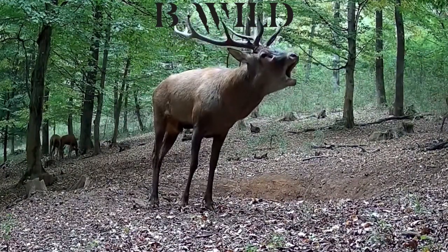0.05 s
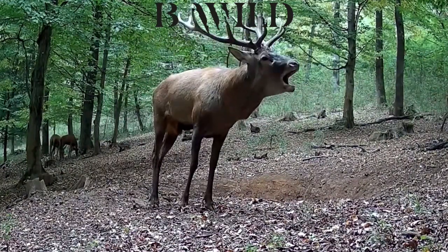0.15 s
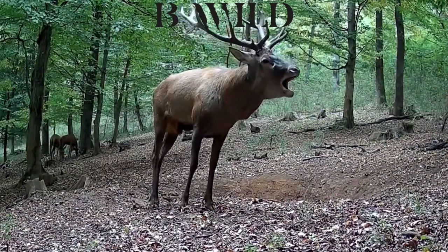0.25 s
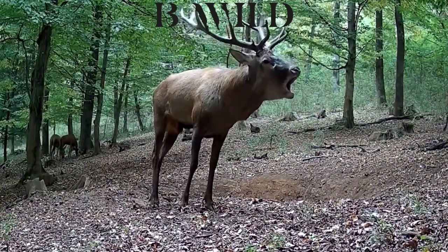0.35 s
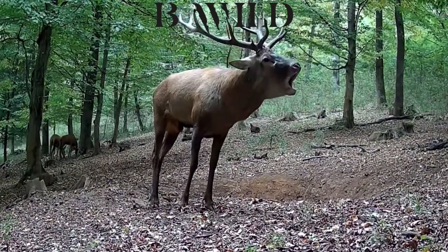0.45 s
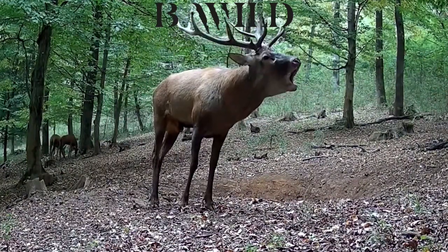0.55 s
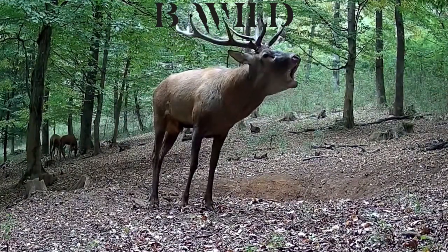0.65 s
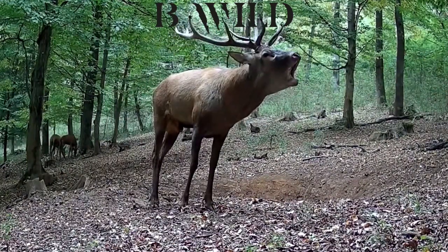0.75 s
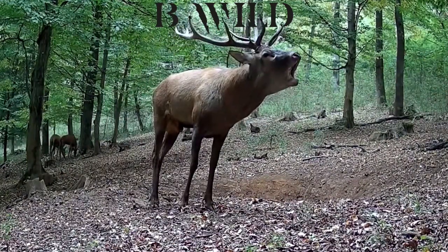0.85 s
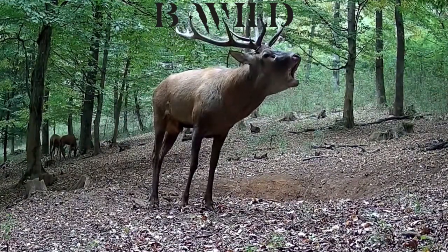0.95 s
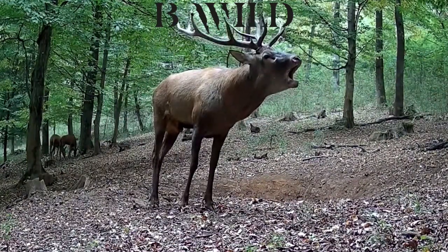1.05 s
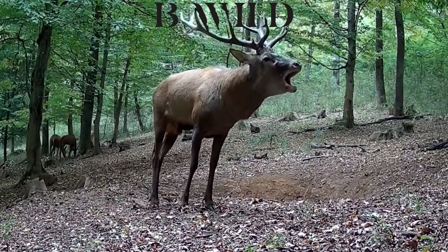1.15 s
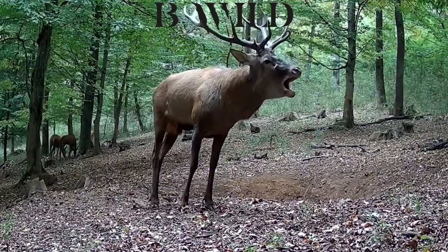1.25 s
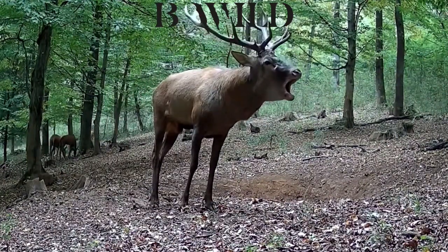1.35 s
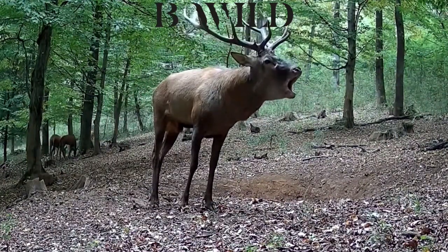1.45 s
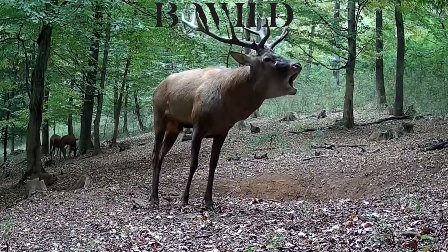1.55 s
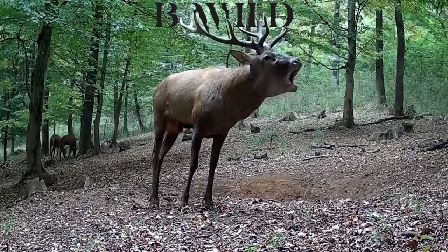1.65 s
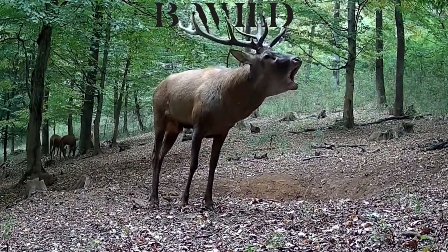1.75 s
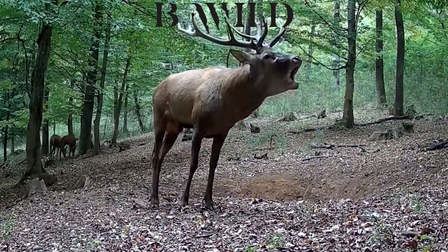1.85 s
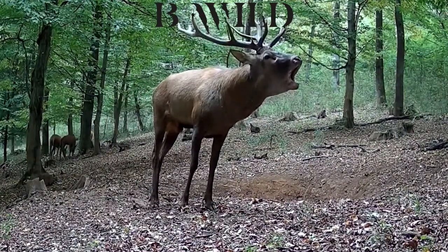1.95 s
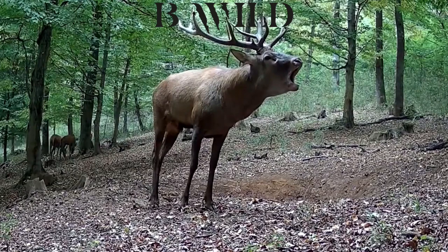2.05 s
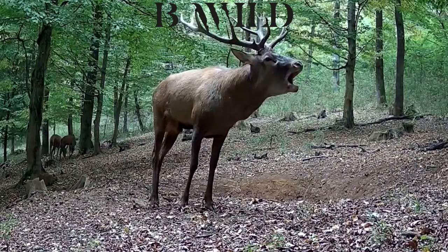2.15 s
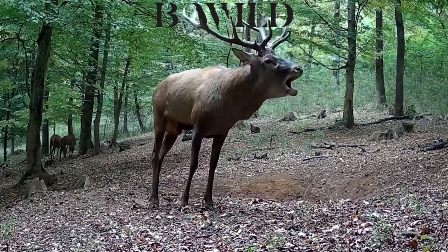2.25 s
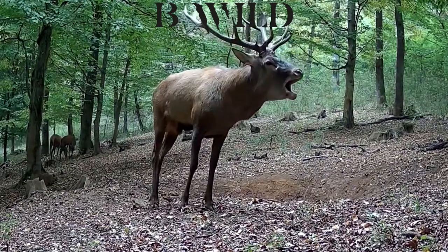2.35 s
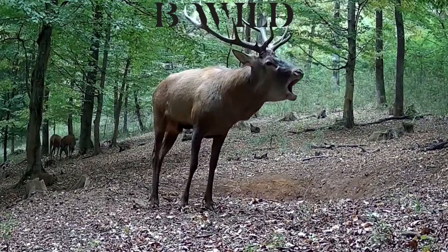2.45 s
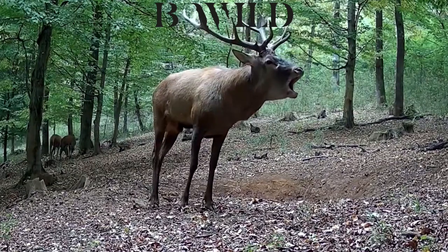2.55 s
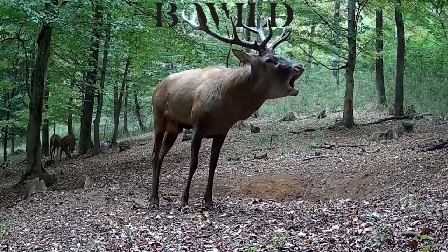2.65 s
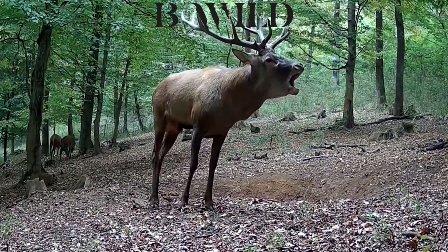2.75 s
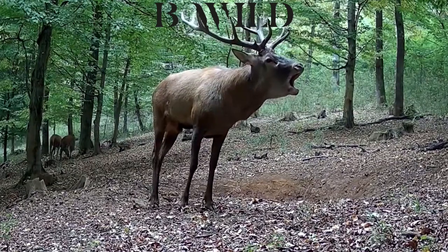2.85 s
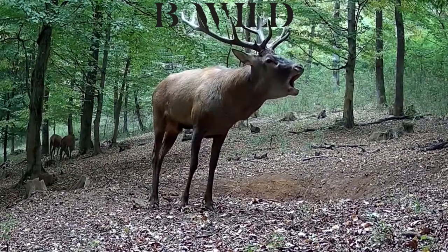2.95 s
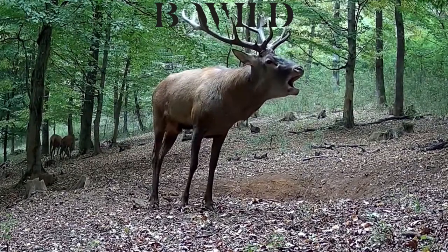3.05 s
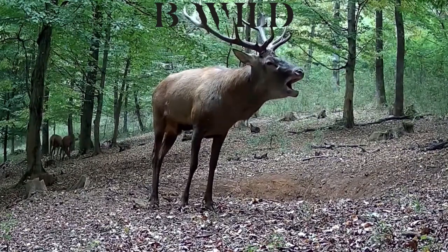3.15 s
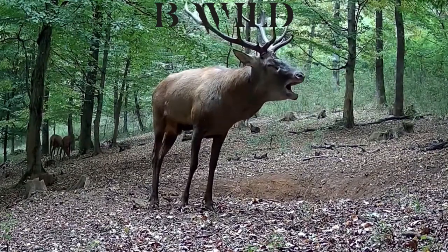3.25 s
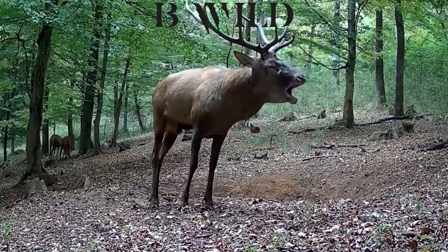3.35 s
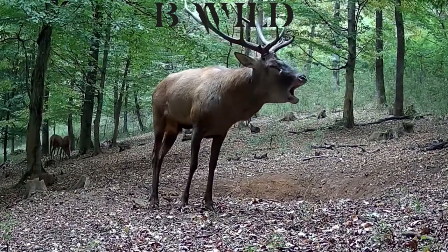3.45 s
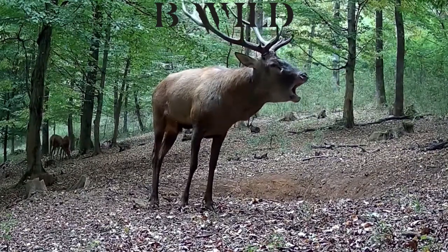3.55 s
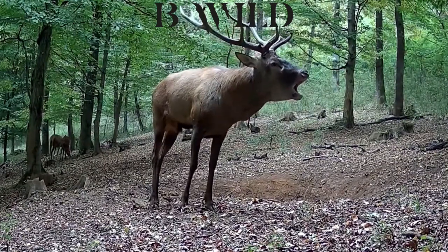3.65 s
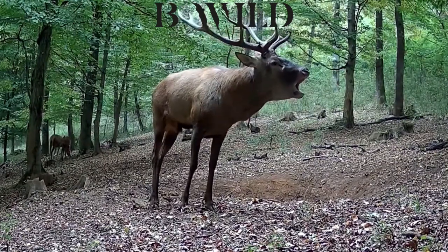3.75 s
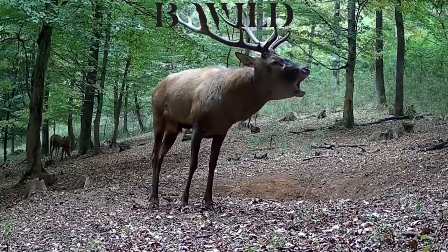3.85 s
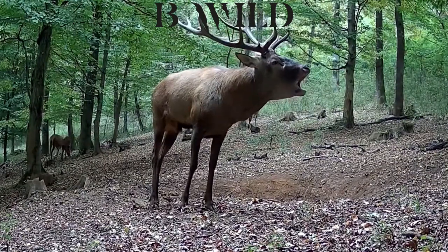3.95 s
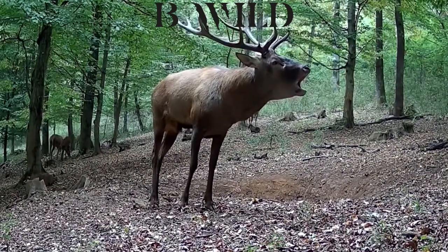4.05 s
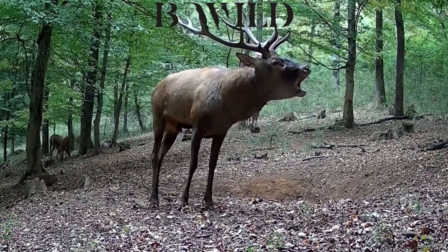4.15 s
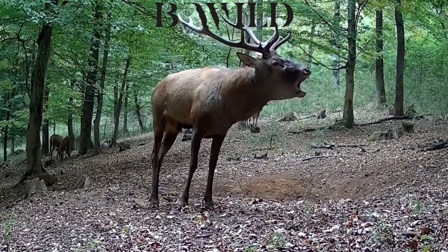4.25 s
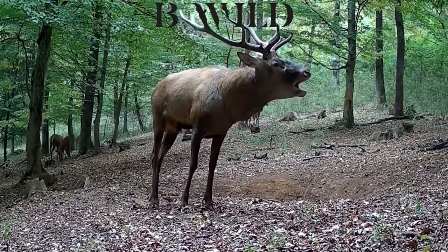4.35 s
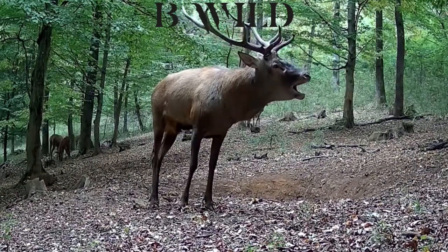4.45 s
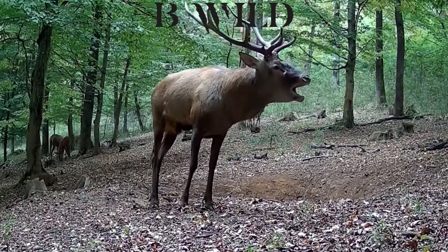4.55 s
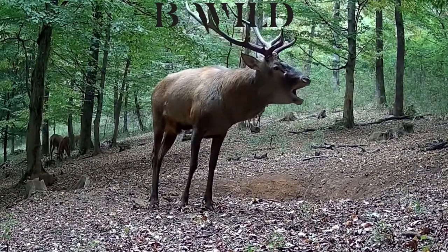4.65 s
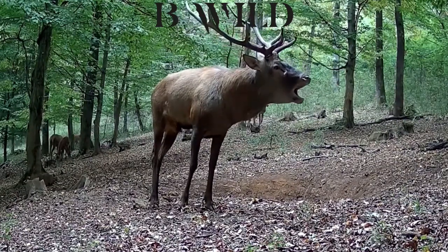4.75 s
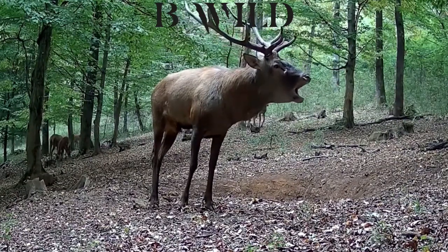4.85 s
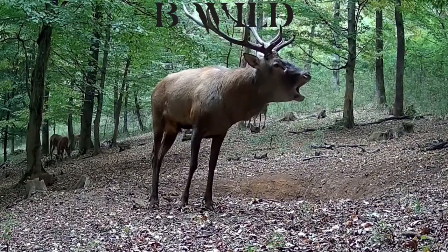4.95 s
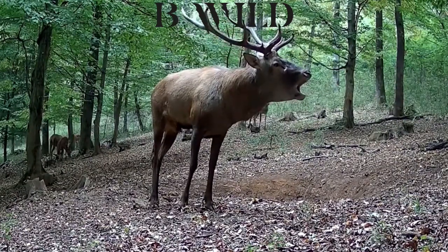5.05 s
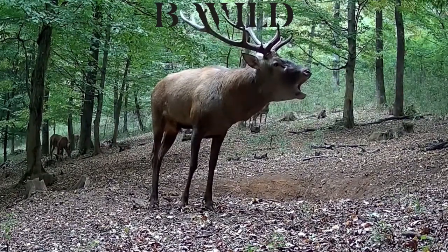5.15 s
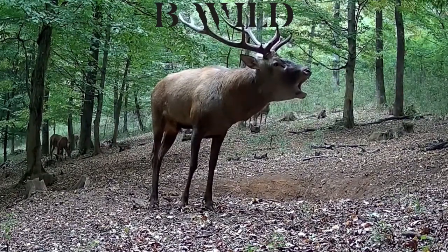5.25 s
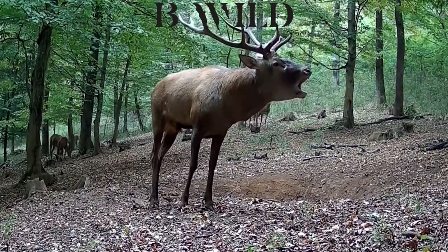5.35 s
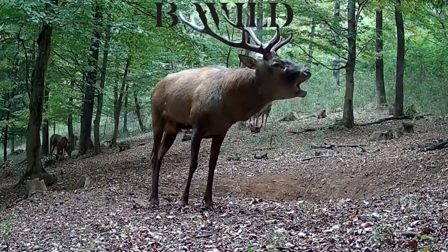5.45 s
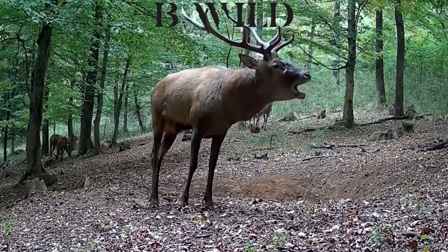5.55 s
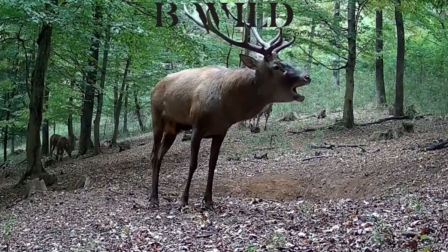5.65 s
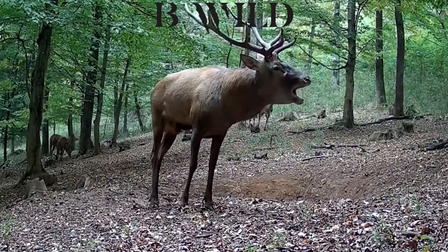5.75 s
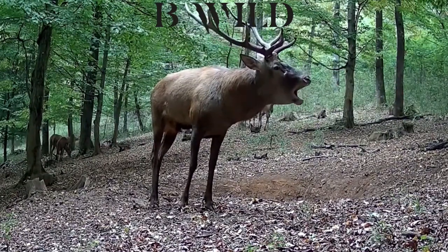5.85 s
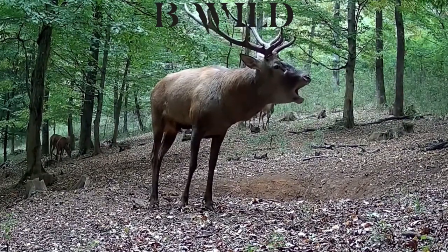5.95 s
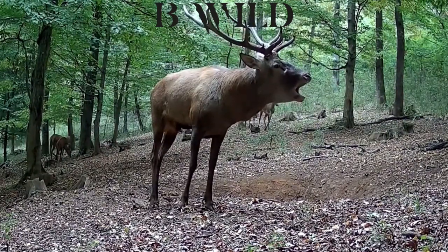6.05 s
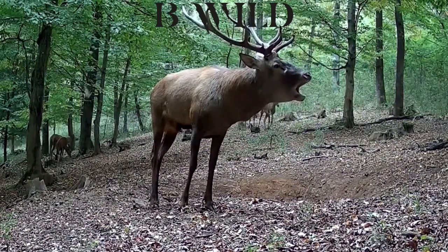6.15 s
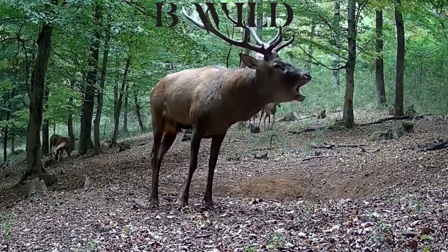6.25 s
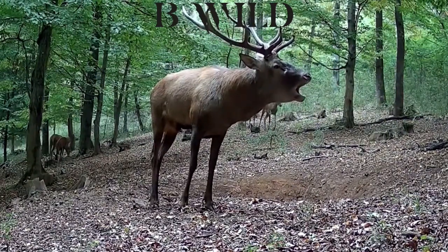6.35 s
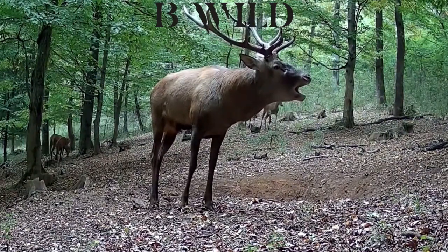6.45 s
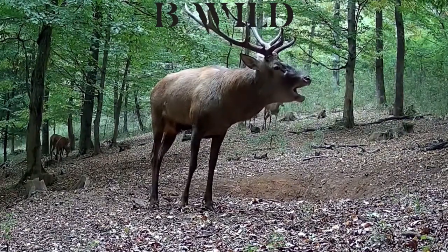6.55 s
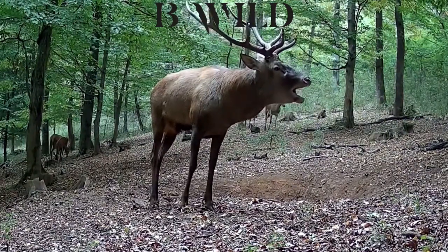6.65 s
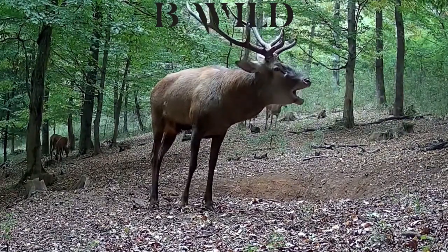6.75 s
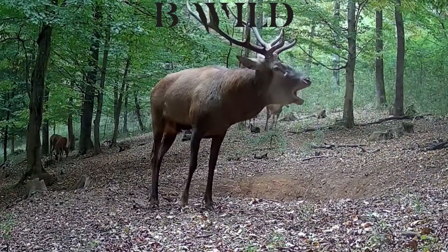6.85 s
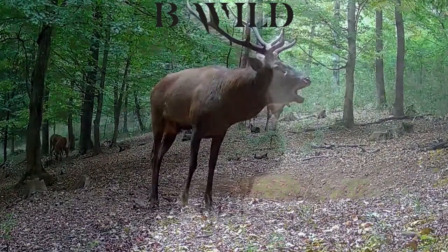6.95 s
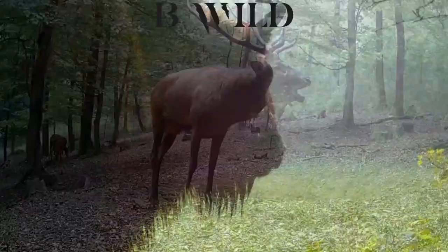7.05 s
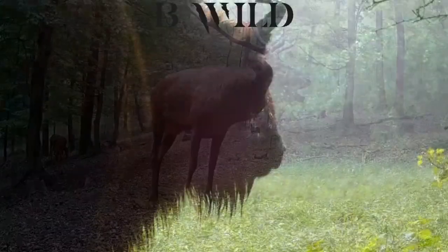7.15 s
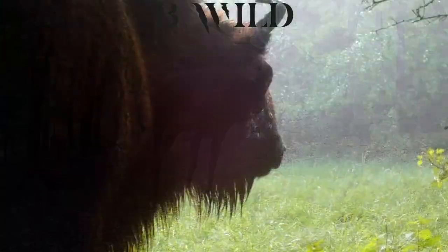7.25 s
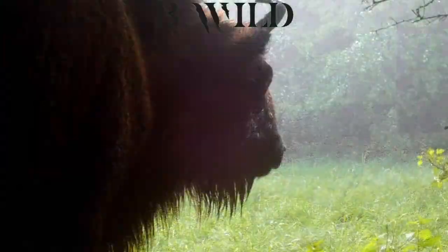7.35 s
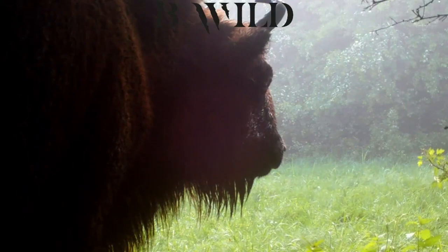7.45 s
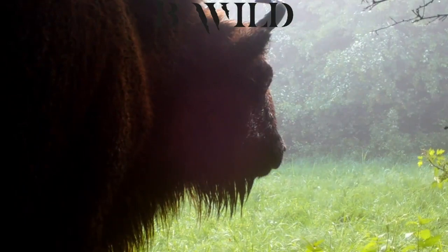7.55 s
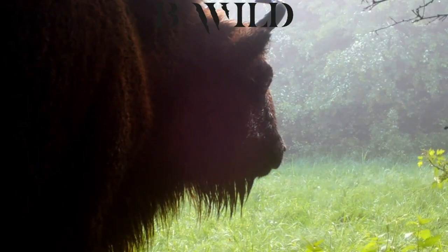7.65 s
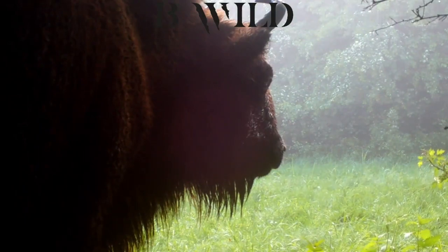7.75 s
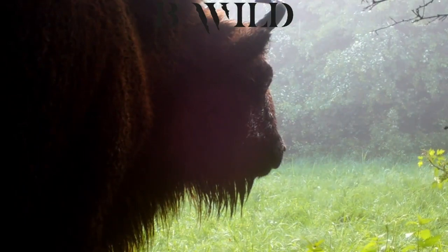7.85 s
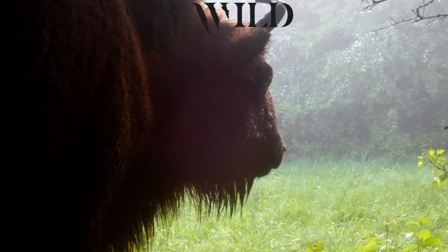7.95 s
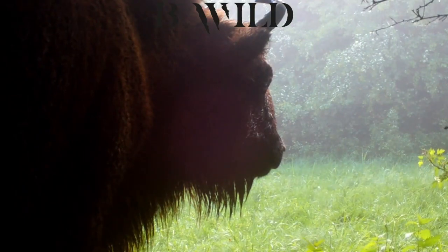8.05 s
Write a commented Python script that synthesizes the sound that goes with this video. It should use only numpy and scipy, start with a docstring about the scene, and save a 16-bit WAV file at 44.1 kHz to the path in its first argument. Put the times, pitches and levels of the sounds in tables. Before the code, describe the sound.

A red deer stag roars close to the microphone in a quiet wood, with a short diffuse echo from the trees and a very faint hush beneath. At 0 s the rough tail of a roar dies at once. Six full roars follow, at about 0.3-1.1, 1.3-2.2, 2.4-3.1, 3.4-4.4, 4.7-5.5 and 5.8-6.5 s, with short gaps. Each swells from a low groan to a hoarse, resonant bellow, then drops in pitch and breaks into grainy, rattling pulses. The first is highest and brightest; the later ones grow deeper, darker and somewhat weaker. At 6.8-7.0 s there is a very soft, low grunt. From about 7.1 s a brighter but quiet outdoor hiss fades in, and a small songbird sings a brief phrase of thin, gliding whistles until about 8.1 s, echoing among trees, with tiny dry ticks near 7.5 and 7.7 s.

```python
"""The tail of a roar, then six full roars of a red deer stag close by in a wood, and a soft grunt.
Slow glottal pulses and puffs of turbulence ring the resonances of his long throat, which sink as he
draws the larynx down; near trunks and the deeper wood answer as diffuse echoes.
A faint hush lies under all of it. At the end a brighter outdoor hiss fades in, gliding tones make a
songbird's short phrase with echoes from the trees, and two noise snaps tick near it."""
import sys
import numpy as np
from scipy import signal
from scipy.fft import rfft, irfft, next_fast_len
from scipy.io import wavfile
from scipy.ndimage import uniform_filter1d, map_coordinates

SR = 44100
rng = np.random.default_rng(int(sys.argv[2]) if len(sys.argv) > 2 else 0)


def materialize(psi):
    """Save the field psi as 16-bit PCM at rate SR to the path in sys.argv[1].

    A 1-D psi becomes a single channel; in a 2-D psi each row is a channel.
    """
    bounded = np.clip(np.atleast_2d(psi).T, -1, 1)
    quanta = np.round(bounded * 32767).astype(np.int16)
    wavfile.write(sys.argv[1], SR, quanta)


N = 356769

# Vocal fold rate before its small drift, one arch a call: time_s, pitch_hz
FOLD_PITCH = [
    [(0, 83.39), (.06, 54.55)],
    [(.29, 72.87), (.39, 107.1), (.5, 116.4), (.56, 122.2), (.68, 118.6), (.88, 114.9), (.95, 108.5),
     (.99, 94.2), (1.1, 60.1)],
    [(1.31, 67.26), (1.39, 98.76), (1.45, 105.2), (1.59, 104.8), (1.64, 98.8), (1.69, 93), (1.78, 89.68),
     (1.97, 87.47), (2.08, 72.48), (2.17, 44.72)],
    [(2.39, 64.18), (2.49, 95), (2.56, 99.53), (2.62, 98.68), (2.68, 91.62), (2.75, 81.52), (2.83, 71.2),
     (3.0, 58.3), (3.12, 37.51)],
    [(3.36, 57.68), (3.45, 80.3), (3.53, 89.36), (3.78, 92.93), (3.9, 88.3), (4.02, 83.95), (4.14, 73.7),
     (4.23, 69.32), (4.4, 40.14)],
    [(4.66, 54.13), (4.78, 81.97), (4.86, 86.08), (4.94, 87.76), (5.1, 86.88), (5.31, 82.45), (5.39, 70.32),
     (5.44, 51.2), (5.52, 39.9)],
    [(5.79, 51.35), (5.9, 75.46), (5.96, 83.84), (6.02, 84.5), (6.09, 81.85), (6.17, 73.94), (6.26, 66.5),
     (6.35, 58.2), (6.5, 41.17)],
    [(6.78, 59.2), (7.03, 36.72)],
]

# Throat resonances in groups from low to high, before the throat length scales them:
# centre_hz, width_hz (of one pole, when the throat is taut), level_db (balance within the group)
BOOM = [(194.6, 79.4, 0)]
BODY = [(383, 83, 20), (527, 56, 0)]
VOWEL = [(979, 104.5, 1.5)]
BLARE = [(1298.5, 46, 0.5), (1597, 110, -11)]
EDGE = [(2040, 150, 1.5), (2350, 160, -0.97)]
RING = [(2640, 130, -7.5), (2832, 190, 4), (3028, 110, 2.5)]
RASP = [(3973, 240, 3.5), (4590, 97, -2.5), (5650, 620, -6)]
SPIT = [(7210, 920, -3), (8680, 210, -1), (9700, 900, -1), (10460, 1100, -6), (13000, 1000, -22)]

# Loudness of each call: time_s, deep_db (boom and body), middle_db (vowel and blare; also leads the treble)
FADING_ROAR = [(0, -13, -30), (.018, -32.5, -38.5), (.06, -37, -59)]
FULL_ROARS = [
    [(0.29, -62.5, -68), (0.31, -46, -57), (0.368, -22.5, -31.5), (0.41, -18.5, -19.5),
     (0.444, -11.5, -22.5), (0.478, -7.5, -16), (0.516, -7.5, -20), (0.668, -10, -19.5), (0.846, -8, -23),
     (0.92, -8.5, -19), (1.004, -13.5, -27), (1.02, -21.5, -35), (1.1, -51, -50)],
    [(1.31, -62.5, -70), (1.35, -36.5, -44.5), (1.39, -22, -25.5), (1.414, -17, -22.5),
     (1.526, -15.5, -11.5), (1.598, -15.5, -19), (1.734, -9, -16), (1.984, -8.5, -22), (2.01, -10.5, -16.5),
     (2.026, -20.5, -19.5), (2.062, -11.5, -20), (2.16, -48, -47.5), (2.17, -41, -58)],
    [(2.39, -68, -68), (2.426, -39, -43), (2.504, -24, -23), (2.606, -13, -19), (2.642, -15.5, -20.5),
     (2.686, -19, -17.5), (2.784, -15.5, -20.5), (2.822, -21.5, -20.5), (2.93, -16.5, -19),
     (2.98, -19.5, -19), (3.004, -12.5, -18), (3.022, -25.5, -24), (3.12, -50.5, -61)],
    [(3.36, -81, -65.5), (3.4, -41, -50), (3.474, -33.5, -32), (3.53, -22, -30.5), (3.556, -28, -25),
     (3.596, -24, -26.5), (3.712, -15, -14), (3.78, -9, -19.5), (3.822, -8, -15.5), (4.078, -15, -17),
     (4.272, -7.5, -23.5), (4.3, -26.5, -26.5), (4.4, -53, -56.5)],
    [(4.66, -83, -73), (4.682, -63, -66), (4.71, -46, -48), (4.888, -25, -27), (5.072, -20, -17.5),
     (5.114, -18.5, -18), (5.306, -17.5, -17.5), (5.372, -13.5, -22), (5.42, -20.5, -22.5),
     (5.444, -26, -33), (5.454, -32, -28.5), (5.468, -33.5, -34.5), (5.52, -59, -58)],
    [(5.79, -81, -69), (5.802, -71.5, -65), (5.84, -47, -53), (5.87, -44.5, -43.5), (6.046, -22, -24.5),
     (6.082, -22, -24), (6.17, -27, -24), (6.25, -20.5, -23.5), (6.264, -23.5, -22.5), (6.38, -21.5, -26),
     (6.386, -46, -25.5), (6.392, -26, -22.5), (6.5, -56.5, -58)],
]
GRUNT = [(6.78, -78, -69.5), (6.82, -56, -60), (6.87, -49, -55), (7.0, -63, -61.5), (7.04, -75.5, -76)]

# Build of each call: low_third_hz (third formant at full stretch), low_fourth_hz, sink (share by which
# the slack throat raises the fourth), pull_s (larynx pull time constant), breaking (roughness at the break, 0-1),
# body_db (over boom), blare_db (over vowel), fifth_db (added to the fifth formant),
# edge_db, ring_db (both over middle), rasp_db (over ring), spit_db (over middle); the last two before roughness
CALL_SHAPES = [(844, 1200, .01, .1, 1, 2, -2, 0.5, -1.5, -5, 0, 0.5),
               (802, 1165, .14, 0.19, 0.97, 7, 1.5, -4, -9, -5.5, -3, 3),
               (881.4, 1175, .15, 0.17, 0.6, 4.5, 0, -4, -12.5, -7, -3.5, 3.5),
               (973, 1270, 0.057, .12, .5, 6, -2.5, -0.5, -14.5, -10.5, -2.5, 0.5),
               (895, 1205, .16, 0.33, 0.8, 7, -0.5, 0.5, -18, -11, -1.5, 2),
               (903, 1220, 0.183, 0.34, 0.7, 5, -1.5, 0, -18, -9.5, -3, 0),
               (1008, 1310, 0.069, 0.39, 0.6, 3, -6, 0.5, -17.5, -13, 0, -1.5),
               (963, 1290, 0.021, 1.5, 0.06, -3.5, 1.5, -10, -22, -18.5, 0, -5)]

# Bird whistles: start_s, length_s, first_hz, middle_hz, last_hz, level_db (relative)
WHISTLES = [(7.071, .06, 2250, 2180, 1800, -55), (7.299, 0.044, 3470, 3090, 2570, -34),
            (7.352, 0.033, 2620, 2530, 2565, -41), (7.422, 0.057, 2200, 2080, 1716, -39.5),
            (7.593, .045, 2820, 2880, 3163, -35.5), (7.636, 0.045, 3150, 3447, 2687, -28),
            (7.729, .05, 5700, 5216, 4420, -34), (7.868, 0.015, 4700, 4090, 3683, -36.5),
            (7.875, 0.045, 3550, 3240, 3182, -31), (7.935, .07, 3030, 3080, 3587, -35.5),
            (8.069, .035, 3650, 3650, 3400, -29.5)]
# Small ticks of twigs or drips near the bird: start_s, level_db (relative)
TICKS = [(7.5143, -35), (7.714, -26)]
# Colour of the ticks: pitch_hz, density_db (per Hz, relative)
TICK_COLOUR = [(1500, -38.5), (5500, -3.5), (9000, 2), (15000, -19.5)]

# Colour of the still wood, then of the open air: pitch_hz, density_db (per Hz, relative)
HUSH_COLOUR = [(15, -23.5), (25, -12), (60, -7.5), (219, -20), (430, -21), (650, -32), (1000, -24.5),
               (1500, -31.5), (2560, -36), (7000, -36.5), (11500, -42.5), (15000, -46.5)]
HISS_COLOUR = [(18, -30), (30, -6.5), (92, 0.5), (197, -3), (420, -6), (575, -8), (1110, -8), (1200, -9.5),
               (2360, -12.5), (3230, -5), (3590, -14), (8280, -14.5), (15500, -21.5)]
# Fade-in of the open air: time_s, level_db
HISS_LEVEL = [(6.95, -100), (7.124, -62.5), (7.352, -52), (7.6, -48.5), (8.09, -48.5)]

# Echo of the deeper wood: pitch_hz, t60_s
DEEP_WOOD = [(100, 0.21), (400, 0.39), (1200, 0.34), (3000, 0.43), (10000, 0.66)]
# What the deeper wood returns: pitch_hz, level_db (relative)
DEEP_RETURN = [(100, -1), (400, 0), (1200, 4), (3000, 5), (10000, 3)]
# Echoes of the near trunks, of the trees round the bird, and the short scatter on each pulse: pitch_hz, t60_s
NEAR_TRUNKS = [(150, 0.14), (1500, .24), (9000, 0.067)]
BIRD_TREES = [(2000, 0.406), (6000, 0.68)]
PULSE_SCATTER = [(1000, 0.12), (9000, .04)]

SPRING_S, SPRING_BACK = .13, 0.45  # the larynx rises again over the end of a call: time, share of the way
THIRD_FOLLOWS = 1.49  # the third formant moves this much further than the fourth
ROUGH_HELD, ROUGH_SLACK = .04, .15  # roughness of a held note; extra while the throat is slack
BREAK_OCTAVES_PER_S = 5.0  # a pitch that falls this fast brings the full roughness of the break
BOOM_TUNING_DB, BODY_TUNING_DB, MIDDLE_TUNING_DB = 3.0, 4.0, 2.5  # weight when a partial meets a resonance
BRIGHT_DB_PER_OCTAVE, PLAIN_HZ = 5.5, 92  # tense folds close harder: treble against pitch
TIRING_DB_PER_S = 4.5  # the treble fades as the air runs out
SLACK_DAMPING = 1.34  # a slack throat's resonances are this many times wider, so single pulses stand apart
HUSH_DB = -60.5  # rms level of the still wood, before its slow drift
TOP_HZ = 15720  # band limit at the microphone


def stag():
    """Pulses and turbulence ring the throat; the two highest groups take the most turbulence."""
    age, left, deep, middle, build = calls()
    (low_third, low_fourth, sink, pull, breaking, body_db,
     blare_db, fifth_db, edge_db, ring_db, rasp_db, spit_db) = build

    # the larynx is drawn down during a call and springs back at its end
    untensed = np.exp(-age / pull)
    slack = untensed + SPRING_BACK * np.clip(1 - left / SPRING_S, 0, 1)
    third = low_third * (1 + THIRD_FOLLOWS * sink * slack) / VOWEL[0][0]
    shortness = low_fourth * (1 + sink * slack) / BLARE[0][0]  # a shorter throat raises every resonance

    # the folds turn uneven as their pitch falls
    pitch = curves(sum(FOLD_PITCH, []))[0]
    fall = uniform_filter1d(-np.gradient(np.log2(pitch)) * SR, size=2600)  # octaves per second
    break_rough = breaking * np.clip(fall / BREAK_OCTAVES_PER_S, 0, 1)
    rough = np.clip(ROUGH_HELD + ROUGH_SLACK * untensed + break_rough, 0, 1)
    pitch = pitch * (1 + .0015 * wobble(14))  # the folds never hold quite still

    pulses, puffs = glottis(pitch, rough)
    pulses, puffs = radiated([pulses, puffs], edge_hz=169, order=3)  # the mouth is too small for deep bass
    # a very short scatter makes neighbouring upper partials unequal; it grows as the throat stretches
    scatter = echo(radiated(pulses, edge_hz=1300, order=2), PULSE_SCATTER, onset=.001)
    pulses = pulses + amp(-1.5) * (1 - untensed) * scatter

    def tuning(modes, scale):
        """Positive when a partial sits on the resonance, negative between two; wide spacing deepens it."""
        return np.cos(2 * np.pi * modes[0][0] * scale / pitch) * pitch / PLAIN_HZ

    boom_scale, body_scale = shortness ** 0.4, third ** 0.8
    body_tuning = BODY_TUNING_DB * tuning(BODY, body_scale)
    boom_tuning = BOOM_TUNING_DB * tuning(BOOM, boom_scale)
    boom, body = deep * split(body_db + body_tuning - boom_tuning)
    middle_tuning = MIDDLE_TUNING_DB * (tuning(BLARE, shortness) - tuning(VOWEL, third))
    vowel, blare = middle * split(blare_db + middle_tuning)

    treble = middle * amp(BRIGHT_DB_PER_OCTAVE * np.log2(pitch / PLAIN_HZ) - TIRING_DB_PER_S * age)
    edge, ring = treble * amp(edge_db), treble * amp(ring_db)
    # a rough voice has more treble
    rasp = ring * amp(rasp_db - 18.5 + 16.5 * rough + 3.1 * wobble(17))
    spit = middle * amp(spit_db - 35.5 + 19 * rough + 1.8 * wobble(26))

    def group(modes, scale, turbulence, drift_db):
        """Neighbouring resonances held at unit level; the soft walls keep shifting their balance."""
        drive = pulses + turbulence * puffs
        rung = np.zeros(N)
        for hz, width, db in modes:
            gain = amp(db + drift_db * wobble(7))
            rung += gain * formant(drive, hz * scale, width, damped=np.clip(slack, 0, 1))
        return steady(bounced(rung))

    stir = .04 + .9 * rough  # turbulence against the pulses
    fourth, (fifth_hz, fifth_width, fifth_rest_db) = BLARE
    blare_modes = [fourth, (fifth_hz, fifth_width, fifth_rest_db + fifth_db)]
    voice = amp(1.33) * boom * group(BOOM, boom_scale, .5 * stir, drift_db=4)
    voice += amp(-1.19) * body * group(BODY, body_scale, .5 * stir, drift_db=3.5)
    voice += amp(0.3) * vowel * group(VOWEL, third, stir, drift_db=0.5)
    voice += blare * group(blare_modes, shortness, stir, drift_db=3.0)
    voice += edge * group(EDGE, shortness ** 0.2, 1.3 * stir, drift_db=2)
    voice += ring * group(RING, shortness ** 0.1, stir, drift_db=7.5)
    voice += rasp * group(RASP, shortness ** 0.4, 1.9 + 3 * stir, drift_db=0.5)
    voice += spit * group(SPIT, shortness ** 0.2, 0.67 + 3 * stir, drift_db=4)
    return side_branch(voice, third)


def calls():
    """Per sample: time since the call began, time left in it, its deep and middle gain, and its build."""
    t = np.arange(N) / SR
    levels = [FADING_ROAR, *FULL_ROARS, GRUNT]
    start, end = np.array([(rows[0][0], rows[-1][0]) for rows in levels]).T
    # the throat takes up the next call's build 50 ms ahead of its start
    which = np.maximum(np.searchsorted(start, t + .05) - 1, 0)
    deep, middle = sum(amp(curves(rows)) * gate(rows, fade=0.0058) for rows in levels)
    age = np.maximum(t - start[which], 0)
    return age, end[which] - t, deep, middle, np.array(CALL_SHAPES)[which].T


def glottis(pitch, rough, jitter=.07, shimmer_db=3.5, puff_decay=1.6):
    """Closures of the folds, uneven when rough, and the puff of turbulence that follows each."""
    cycles = np.cumsum(pitch * (1 + 0.01 * rough * wobble(30))) / SR
    at = np.interp(np.arange(1, int(cycles[-1])), cycles, np.arange(N))  # sample of each closure
    chance = rng.standard_normal((len(at), 2))
    here = at.astype(int)
    shift = jitter * rough[here] ** 2 * chance[:, 0] * SR / pitch[here]
    at = np.clip(at + shift, 8, N - 10)
    size = amp(shimmer_db * rough[here] * chance[:, 1])
    # a windowed sinc sets each pulse between samples
    taps = at.astype(int)[:, None] + np.arange(-7, 9)
    offset = taps - at[:, None]
    shape = np.sinc(offset) * np.cos(np.pi * offset / 16) ** 2
    pulses = np.bincount(taps.ravel(), (size[:, None] * shape).ravel(), N)
    puffs = np.exp(-puff_decay * (cycles % 1)) + .1
    return unit(pulses), unit(puffs * rng.standard_normal(N))


def formant(x, hz, width, damped=0):
    """A gliding resonance with steep skirts (two equal poles), cross-faded into a wider one when damped."""
    turn = np.exp(2j * np.pi * np.cumsum(np.ones(N) * hz) / SR)
    base = x * turn.conj()  # the resonance moved down to 0 Hz

    def rung(pole_width):
        """The two-pole lowpass at 0 Hz, moved back up to the resonance."""
        r = np.exp(-np.pi * pole_width / SR)
        return (turn * signal.lfilter([(1 - r) ** 2], [1, -2 * r, r * r], base)).real

    narrow, wide = rung(width), rung(width * SLACK_DAMPING)
    return narrow + damped * (wide - narrow)


def side_branch(x, scale, notch_hz=685, width_hz=200, depth=0.56):
    """A side cavity of the throat swallows one band, which sinks as the throat lengthens."""
    return x - 2 * depth * formant(x, notch_hz * scale, width_hz)


def radiated(x, edge_hz, order):
    """A small opening radiates little of the bass below edge_hz."""
    return signal.sosfilt(signal.butter(order, edge_hz, "high", fs=SR, output="sos"), x)


def bounced(x, delay=0.002456, share=0.36):
    """x and its reflection, delay seconds later, off the leafy ground, which swallows the treble."""
    return filtered(x, lambda hz: 1 + share * np.exp(-2j * np.pi * hz * delay) / (1 + (hz / 5000) ** 2))


def echo(x, t60s, onset):
    """Diffuse answer of energy 1 that builds up over onset seconds; each frequency dies at its own speed."""
    hz, t, z = signal.stft(rng.standard_normal(SR), SR, nperseg=256)
    decay = amp(-60 * t / along(t60s, hz)[:, None])
    tail = signal.istft(z * decay * (1 - np.exp(-t / onset)), SR, nperseg=256)[1]
    return signal.fftconvolve(x, tail / np.linalg.norm(tail))[:N]


def bird():
    """Whistles that glide along a parabola with a fine quaver, and a long answer from the trees."""
    song, t = np.zeros(N), np.arange(N) / SR
    quaver, flutter = 1 + 0.019 * wobble(350), amp(2.2 * wobble(120))
    for start, length, first, middle, last, db in WHISTLES:
        u = np.clip((t - start) / length, 0, 1)
        hz = np.polyval(np.polyfit([0, .5, 1], [first, middle, last], 2), u)
        swell = np.sqrt(8 * u * (1 - u))  # silent before and after the whistle
        song += amp(db) * swell * flutter * np.sin(2 * np.pi * np.cumsum(hz * quaver) / SR)
    return amp(-2.0) * song + amp(-5.5) * echo(song, BIRD_TREES, onset=0.01)


def ticks(decay=0.0094):
    """Tiny dry snaps: bursts of coloured noise that fall 60 dB in decay seconds."""
    t = np.arange(N) / SR
    snaps = sum(amp(db - 60 * np.abs(t - start) / decay) * (t >= start) for start, db in TICKS)
    return amp(-4.5) * snaps * noise(TICK_COLOUR)


def open_air():
    """A brighter outdoor hiss of coloured noise that fades in at the end."""
    fade = np.clip((np.arange(N) / SR - HISS_LEVEL[0][0]) / 0.13, 0, 1)
    return amp(curves(HISS_LEVEL)[0]) * fade * noise(HISS_COLOUR)


def still_wood():
    """The faint hush of the wood: coloured noise whose level drifts slowly."""
    return amp(HUSH_DB + 0.7 * wobble(1.3)) * noise(HUSH_COLOUR)


def amp(db):
    """Decibels to gain."""
    return 10 ** (np.asarray(db) / 20)


def unit(x):
    """x at rms 1."""
    return x / np.sqrt(np.mean(x ** 2) + 1e-20)


def split(lead_db):
    """Two gains that share a power of 1, the second leading by lead_db."""
    return np.array([np.ones(N), amp(lead_db)]) / np.hypot(1, amp(lead_db))


def along(points, hz):
    """(Hz, value) points read on a log frequency axis."""
    f, v = np.transpose(points)
    return np.interp(np.log(hz + 1), np.log(f + 1), v)


def curves(rows):
    """One value per sample for each column after the time."""
    s, *cols = np.transpose(rows)
    return [np.interp(np.arange(N) / SR, s, c) for c in cols]


def gate(rows, fade):
    """1 while a table runs, fading at both ends."""
    t = np.arange(N) / SR
    return np.clip(np.minimum(t - rows[0][0], rows[-1][0] - t) / fade + .5, 0, 1)


def wobble(rate):
    """A smooth random curve, rate knots a second."""
    return map_coordinates(rng.standard_normal(int(N * rate / SR) + 4), [np.arange(N) * rate / SR])


def filtered(x, response):
    """x times a response of frequency."""
    m = next_fast_len(N + SR // 2)
    return irfft(rfft(x, m) * response(np.fft.rfftfreq(m, 1 / SR)), m)[:N]


def noise(spectrum):
    """Coloured noise of rms 1."""
    return unit(filtered(rng.standard_normal(N), lambda hz: amp(along(spectrum, hz))))


def steady(x, size=1800):
    """x with its slow level held at 1; single pulses keep their shape."""
    power = uniform_filter1d(uniform_filter1d(x ** 2, size), size)
    return x / np.sqrt(np.abs(power) + 1e-14)


def scene():
    """The stag close by, answered by near trunks and then by the deeper wood, with bird and air behind."""
    roar = stag()
    near = amp(-16.5) * echo(roar, NEAR_TRUNKS, onset=.004)
    returned = filtered(roar, lambda hz: amp(along(DEEP_RETURN, hz)))
    far = amp(-27) * echo(returned, DEEP_WOOD, onset=.03)
    return (roar + near + far + bird() + ticks() + open_air() + still_wood())[None]


def record(dry):
    """The microphone channel: peaks round off at full scale; nothing is kept above the band limit."""
    rounded = dry[0] / (1 + np.abs(dry[0]) ** 12) ** (1 / 12)
    return filtered(rounded, lambda hz: hz < TOP_HZ)[None]


dry = scene()
out = record(dry)
materialize(out)
```